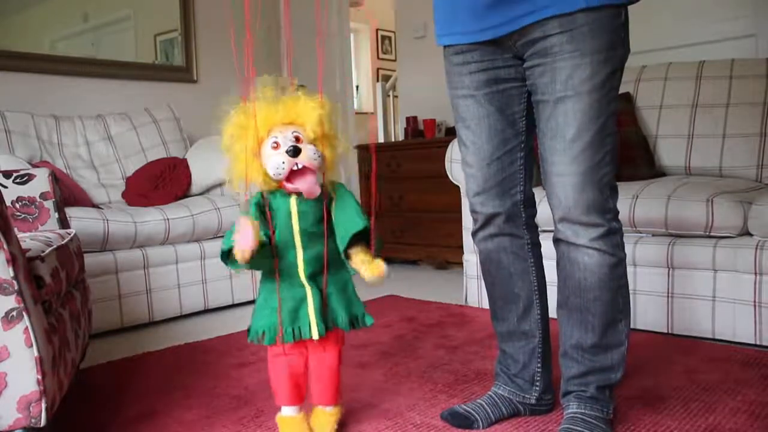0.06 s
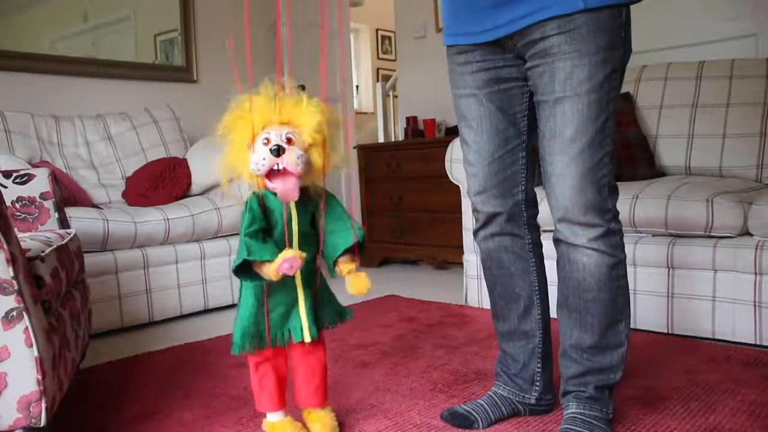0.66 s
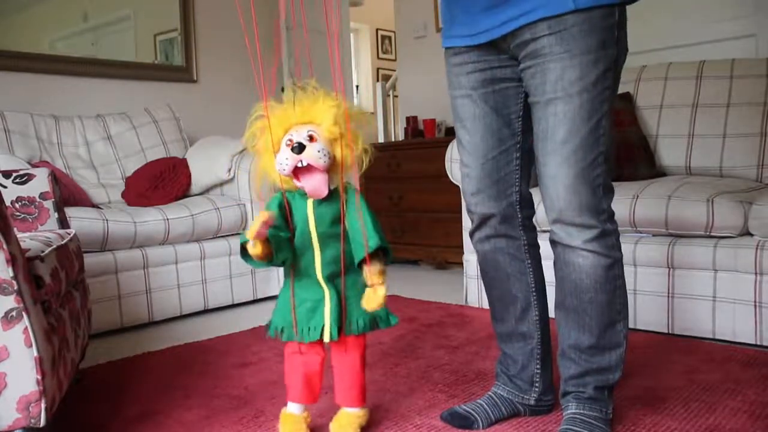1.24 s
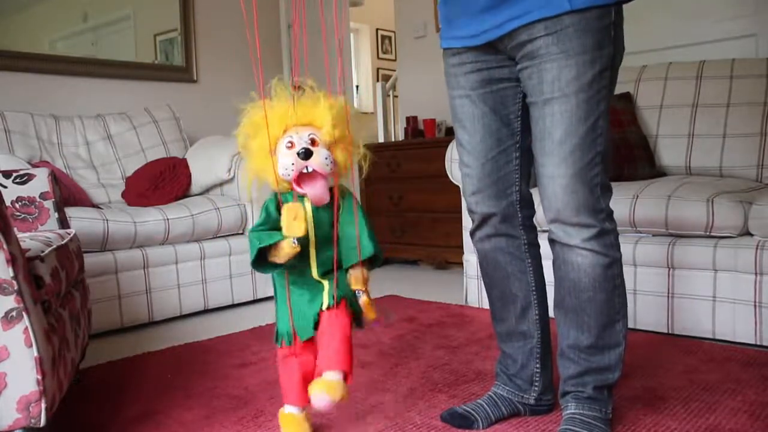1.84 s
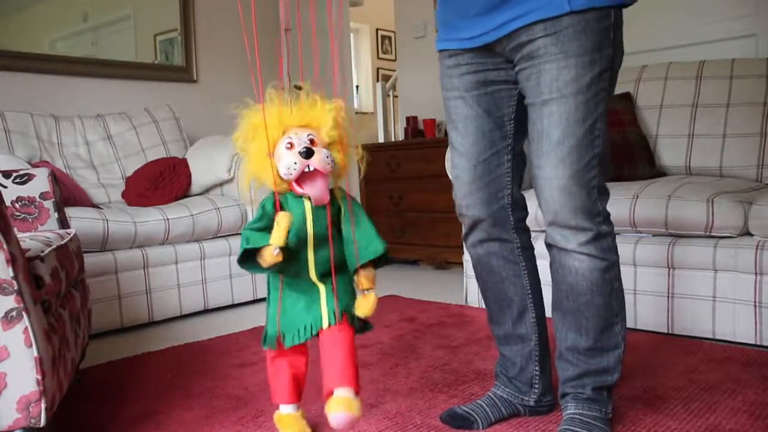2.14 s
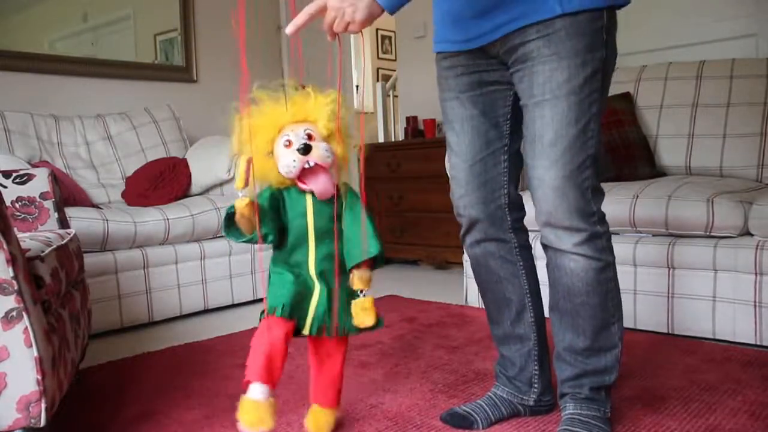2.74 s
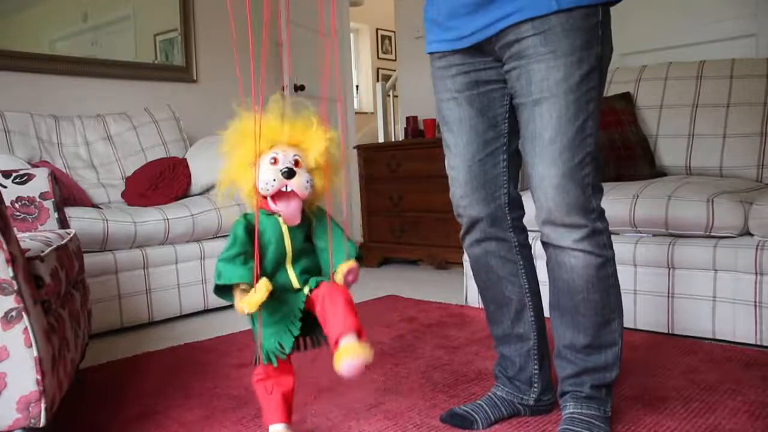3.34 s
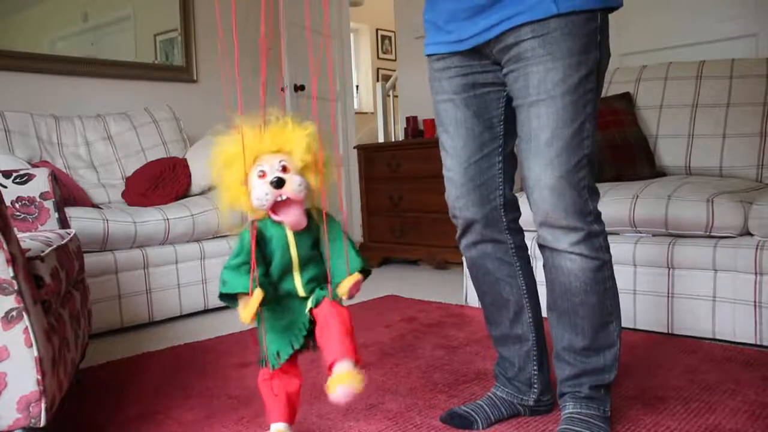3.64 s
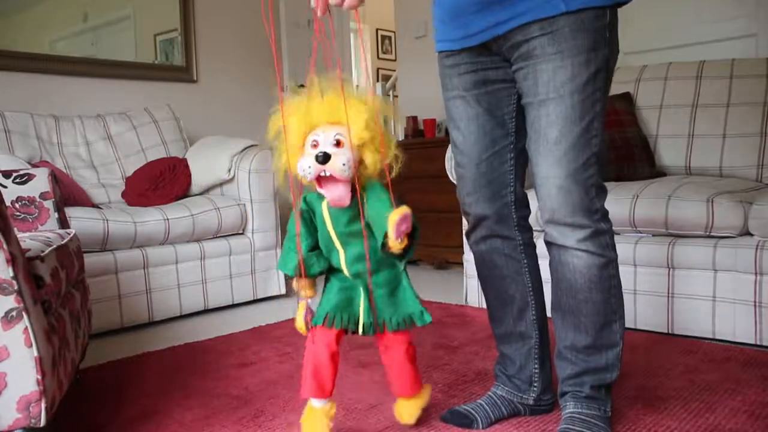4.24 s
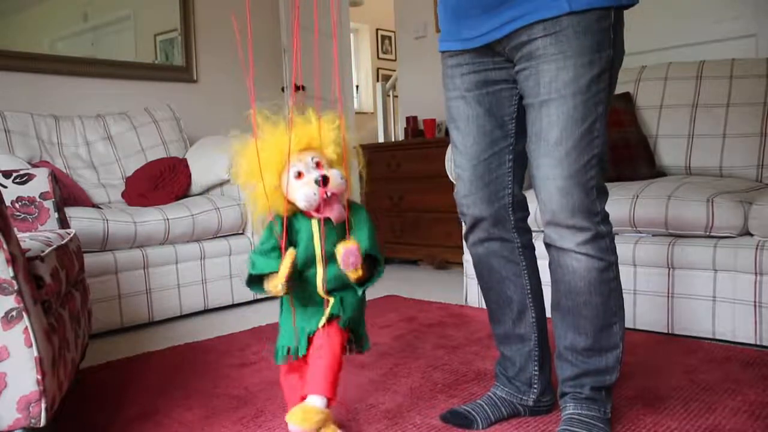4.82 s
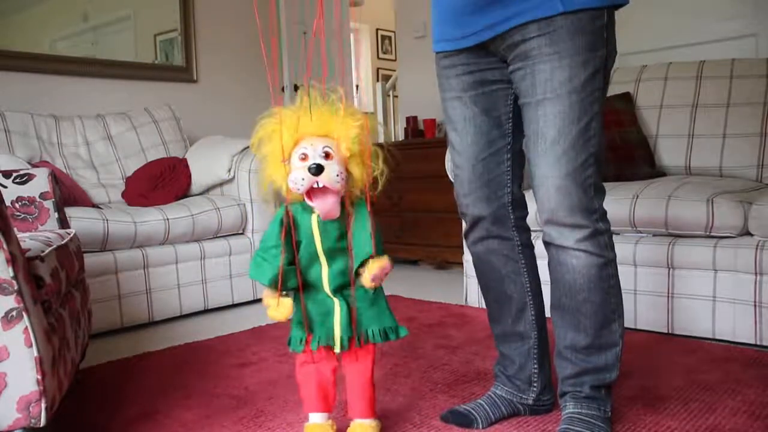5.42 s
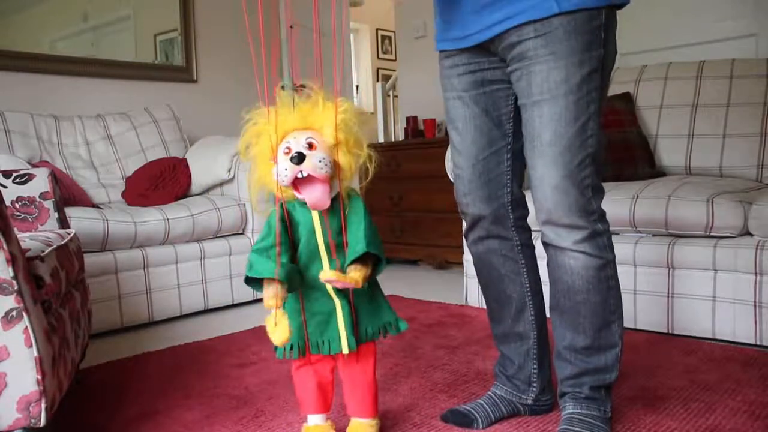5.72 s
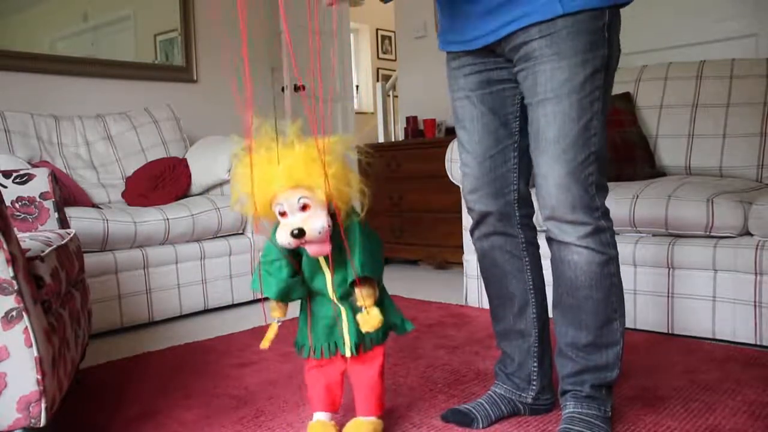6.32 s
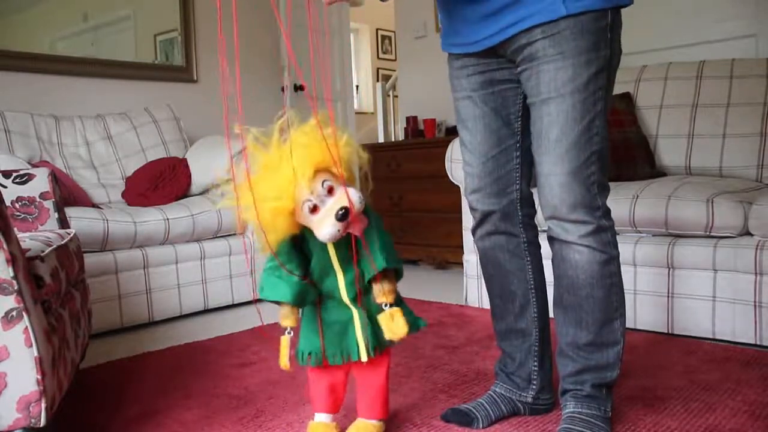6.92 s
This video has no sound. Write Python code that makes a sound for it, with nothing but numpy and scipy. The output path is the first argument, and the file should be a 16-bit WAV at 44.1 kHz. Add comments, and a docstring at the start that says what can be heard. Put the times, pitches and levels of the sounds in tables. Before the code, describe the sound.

Light wooden clicks and clacks from a moving marionette, with soft thuds and rubbing strings, over a faint living room hush.

```python
"""A wooden string puppet dances over a carpet in a quiet living room.
The sticks of its control bar and its limbs knock together, each contact a click that sets the wood
ringing; twice they bounce into a loud clatter, and soft blows thud on its hollow body.
Strings and cloth rub in between and jog the loose joints into faint ticks.
The furnished room answers briefly over a faint steady hush."""
import sys
import numpy as np
from scipy import signal
from scipy.fft import rfft, irfft
from scipy.io import wavfile
from scipy.ndimage import uniform_filter1d

SR = 44100
rng = np.random.default_rng(int(sys.argv[2]) if len(sys.argv) > 2 else 0)


def store_pcm(level_fs):
    """Save levels as 16-bit WAV."""
    pcm = np.round(np.clip(level_fs, -1, 1) * 32767).astype(np.int16)
    wavfile.write(sys.argv[1], SR, np.atleast_2d(pcm).T)


N = 311346

# tone of the still room: (frequency [Hz], relative level [dB])
HUSH_SPECTRUM = [(15, -38), (30, -20), (44, 0), (62, -9), (115, -6), (240, -5.5), (340, -6.5), (425, -5.5),
                 (560, -9), (1000, -10.5), (2000, -13.5), (6500, -18), (11000, -22.5), (16000, -30.5)]
# how alike the hush is in both ears: (frequency [Hz], correlation [0-1])
HUSH_LIKENESS = [(40, 0.74), (110, 0.27), (300, 0.38), (800, 0.25), (3000, 0.033), (14000, 0.043)]
# strings and joints rubbing: (start [s], end [s], wood rasp [dB], string hiss [dB])
RUB_STROKES = [(0, 0.198, -60, -56.5), (0.209, 0.253, -57.5, -60), (0.268, 0.325, -54.5, -53.5),
               (0.404, 0.498, -52.5, -57), (0.605, 0.662, -55, -58.5), (0.693, 0.827, -56, -65),
               (1.147, 1.202, -47, -57), (1.203, 1.293, -44, -60), (1.712, 1.803, -46, -57),
               (2.311, 2.364, -50, -61), (2.377, 2.618, -67, -67), (2.915, 3.207, -62.5, -64.5),
               (3.757, 4.074, -60, -61), (4.377, 4.473, -58, -65), (5.041, 5.095, -58, -69),
               (5.275, 5.336, -48, -54), (5.386, 5.668, -59.5, -69), (6.233, 6.264, -53, -60)]
# tone of a rub on wood: (frequency [Hz], relative level [dB])
RASP_SPECTRUM = [(150, -40), (410, 16), (600, -6.5), (1000, 7), (1600, 5), (2400, 7.5), (3000, 9),
                 (3600, 6.5), (4450, 7), (5300, 0), (9000, -7.5), (16000, -11)]
# tone of a sliding string: (frequency [Hz], relative level [dB])
HISS_SPECTRUM = [(2000, -62), (5400, 6), (6500, 6.5), (7600, 16), (8700, 1), (11500, -20), (16000, -30)]
# resonances of the sticks: (frequency [Hz], level [dB], t60 [s])
STICK_RESONANCES = [(2160, -39, 0.047), (2276, -21.5, 0.17), (2485, -6.5, 0.011), (2572, -8, 0.08),
                    (2665, -26.5, 0.058), (3224, -13, 0.014), (3150, -49, .035), (3626, -5.5, 0.036),
                    (4183, -54, 0.051), (4440, -14, 0.086), (4750, -13, 0.033), (6350, -11, 0.019),
                    (7270, -21.5, 0.016), (6860, -10, 0.018)]
# tone of the bare contact of two sticks: (frequency [Hz], relative level [dB])
CONTACT_SPECTRUM = [(100, -31), (300, -15), (450, -5.5), (700, -10.5), (1000, -6.5), (1500, -10),
                    (2100, 4.5), (3000, -0.5), (4400, 2.5), (5500, -8.5), (7200, -6.5), (8600, -12),
                    (11000, -6.5), (16000, -9.5)]
# notes of the loose pieces: (frequency [Hz])
PIECE_NOTES = [2070, 2250, 2580, 3270, 3630, 4210, 4440, 4680]
# wood on wood: (time [s], strength [dB], struck piece's note [Hz], note's ring [dB], brightness [dB])
WOOD_HITS = [(0.607, -25, 6320, 3.5, 8.5), (0.728, -31, 4380, -10, 13), (0.7452, -23, 4460, -8.5, 7.5),
             (0.7608, -29.5, 2600, 13, -1), (0.7806, -18.5, 4440, 3.5, 1), (0.8087, -26, 4350, 1, 3),
             (0.8437, -18.5, 4470, 4, 4), (0.9623, -12, 2420, -4.5, 2.5), (1.1436, -18.5, 2650, 3.5, 5),
             (1.2712, -11, 4420, 2, 9), (1.276, -6, 2250, 5, -2), (1.2813, -5.5, 3530, 1.5, 8.5),
             (1.285, -7.5, 4440, 3.5, -18), (1.2967, -22, 4440, 10, 9), (1.3213, -11, 2300, -10, 2),
             (1.3328, -12.5, 3530, 5.5, 6), (1.4577, -24.5, 2606, 4, 2.5), (1.6816, -18.5, 4530, 3.5, 5.5),
             (1.6899, -16.5, 4300, -4.5, 2.5), (1.7329, -25, 2500, 2, -8), (1.7821, -20, 2290, -5, -18),
             (1.8439, -15.5, 2330, 0, 4), (1.868, -17, 2350, 1, 1.5), (2.1623, -25.5, 4420, -1.5, 1),
             (2.273, -27, 2360, 2, 9), (2.327, -28.5, 4300, 7, 0), (2.343, -31.5, 2510, 8.5, -6),
             (2.61, -33.5, 2520, 3, 4.5), (2.932, -28, 3840, 3, 4), (3.068, -24.5, 2366, 3, 4.5),
             (3.0852, -27, 2570, 4, 6), (3.1188, -32, 2160, -3, -6), (3.1554, -26.5, 2880, -3, 2),
             (3.2268, -28.5, 2680, 5, 10), (3.4664, -35.5, 2820, 6.5, 8), (3.603, -32.5, 2880, 5.5, 9),
             (3.682, -20, 3580, 2, -7.5), (4.1811, -23.5, 2670, 4.5, 6), (4.449, -16.5, 2580, -4.5, -10),
             (5.1115, -23, 2380, -1, -2), (5.1316, -8.5, 2500, 0, -1.5), (5.1492, -13.5, 3480, 3, 4),
             (5.194, -22, 4350, 11, 7), (5.2036, -1.5, 2550, -3, -6), (5.219, -14, 3560, 4, 3),
             (5.2912, -23.5, 2640, 5, 8), (5.313, -22.5, 3830, 4, 12.5), (5.508, -26.5, 2260, 0, 7),
             (5.5495, -25, 2750, -9.5, -3), (5.7697, -25, 4400, 2, 6.5), (5.9119, -32, 2730, 4.5, 1),
             (6.3241, -21, 2335, -2, 8), (6.3445, -25, 2580, 9, 6), (6.348, -23, 4470, 9.5, -4),
             (6.3898, -23, 2355, 6.5, 5)]
# loose limbs bouncing together after a jerk: (start [s], end [s], strength [dB])
LIMB_CLATTERS = [(1.258, 1.352, -16.5), (5.128, 5.232, -23)]
# soft blows on the hollow body: (time [s], level [dB])
BODY_HITS = [(1.324, -28), (1.752, -48.5), (1.847, -43), (2.335, -49), (3.068, -50), (3.118, -50),
             (4.449, -40.5), (5.232, -34), (6.571, -44.5)]
# resonances of the body: (frequency [Hz], level [dB], t60 [s])
BODY_RESONANCES = [(368, -7, .06), (400, 0, .07), (470, -8, .05), (545, -13, .04), (700, -17, .025),
                   (950, -17, .02)]
# early reflections off ceiling, walls and furniture: (delay [s], left gain [x], right gain [x])
REFLECTIONS = [(.0007, 0.1, 0.027), (.0014, 0.037, 0.21), (.0040, 0.37, 0.47), (.0075, 0.13, 0.18),
               (0.0105, 0.3, 0.36), (0.0142, 0.19, 0.21)]
# decay of the room's tail: (frequency [Hz], t60 [s])
ROOM_DECAY = [(250, 0.18), (700, 0.65), (2000, 0.27), (4500, 0.27), (9000, 0.34), (15000, 0.074)]
# the puppet's stereo balance: (frequency [Hz], left over right [dB])
BALANCE = [(100, -2), (400, -0.5), (700, -1.5), (2400, -3.5), (4400, -1.5), (8000, 0.5), (15000, 1.5)]


def amp(db):
    """Decibels to gain."""
    return 10 ** (np.asarray(db) / 20)


def unit(x):
    """Scales to an rms of 1."""
    return x / np.sqrt(np.mean(x ** 2) + 1e-20)


def curve(points, hz):
    """Joins (frequency [Hz], value) points by straight lines on a log-frequency axis."""
    point_hz, value = np.transpose(points)
    return np.interp(np.log(hz + 1), np.log(point_hz + 1), value)


def add(mix, s, sound):
    """Mixes a sound in at s seconds."""
    part = mix[max(round(s * SR), 0):][:len(sound)]
    part += sound[:len(part)]


def equalise(x, points):
    """Runs a whole track through an EQ of (frequency [Hz], level [dB]) points."""
    return irfft(rfft(x) * amp(curve(points, np.fft.rfftfreq(N, 1 / SR))), N)


def pulse(points, size=1024):
    """The tightest one-sided pulse with a spectrum of (frequency [Hz], level [dB]) points."""
    log_gain = np.log(amp(curve(points, abs(np.fft.fftfreq(size, 1 / SR)))))
    return np.fft.ifft(np.exp(np.conj(signal.hilbert(log_gain)))).real[:size // 2]


def ring(modes, t, uneven_db, detune):
    """Dying sines, one row a mode; where the blow lands shifts their levels and pitch a little."""
    hz, db, t60 = np.transpose(modes)[:, :, None]
    share, pitch = rng.standard_normal((2, len(modes), 1))
    sines = np.sin(2 * np.pi * hz * (1 + detune * pitch) * t)
    return amp(db + uneven_db * share) * sines * np.exp(-np.log(1000) * t / t60)


def hush(level_db=-52.5):
    """A bed of steady house noise, narrow in the bass and wide on top."""
    left, other = rfft(rng.standard_normal((2, N)))
    likeness = curve(HUSH_LIKENESS, np.fft.rfftfreq(N, 1 / SR))
    right = likeness * left + np.sqrt(1 - likeness ** 2) * other
    return amp(level_db) * unit(equalise(irfft([left, right], N), HUSH_SPECTRUM))


def rubs(slips_per_s=4500, slip_spread_db=2.8, ringing=0.044, fade_share=0.55, catch_db=2, idle_db=-66):
    """Tiny uneven slips rasp and ring the wood while the strings hiss; the costume never quite rests."""
    t = np.arange(N) / SR
    rasp_level, hiss_level = np.zeros((2, N))
    for start, end, rasp_db, hiss_db in RUB_STROKES:
        inside = np.minimum(t - start if start > 0 else end, end - t) / (end - start)
        stroke = np.sin(np.pi / 2 * np.clip(2 * inside / fade_share, 0, 1)) ** 2
        rasp_level += amp(rasp_db - 1) * stroke
        hiss_level += amp(hiss_db - 2) * stroke
    sizes = amp(slip_spread_db * np.minimum(rng.exponential(1, N), 4)) * rng.choice([-1, 1], N)
    slips = unit(sizes * (rng.random(N) < slips_per_s / SR))
    sticks = ring(STICK_RESONANCES, np.arange(SR // 8) / SR, uneven_db=0, detune=0).sum(0)
    stick_ring = unit(signal.oaconvolve(slips, sticks)[:N])
    wood = unit(unit(equalise(slips, RASP_SPECTRUM)) + ringing * stick_ring)
    string = unit(equalise(slips + rng.standard_normal(N), HISS_SPECTRUM))
    # the surfaces catch and let go every few hundredths of a second
    grip = uniform_filter1d(uniform_filter1d(rng.standard_normal(N), size=700), size=300)
    catch = amp(catch_db * unit(grip))
    return catch * ((rasp_level + amp(idle_db) * catch) * wood + hiss_level * string)


def rattle(spans, per_s, ring_db, bright_db, uneven_db=2, spread_db=0.5, ends_db=-5, count=32):
    """Rows of small knocks: random loose pieces meet at uneven gaps, hardest mid-span."""
    hits = []
    for start, end, db in spans:
        times = start + (np.arange(count) + rng.random(count)) / per_s
        notes = rng.choice(PIECE_NOTES, count)
        for s, hz, (size, free, bright) in zip(times, notes, rng.standard_normal((count, 3))):
            if s < end:
                arch_db = ends_db * (2 * (s - start) / (end - start) - 1) ** 2
                hit_db = db + arch_db + uneven_db * size
                hits.append((s, hit_db, hz, ring_db + spread_db * free, bright_db + spread_db * bright))
    return hits


def loose_joints(tick_over_rasp_db=20.5):
    """Rubs jog the joints into sparse ticks; jerks set the limbs bouncing in a fast clatter."""
    bounces = rattle(LIMB_CLATTERS, per_s=200, ring_db=5, bright_db=3)
    jogs = [(start, end, rasp_db + tick_over_rasp_db) for start, end, rasp_db, _ in RUB_STROKES]
    ticks = rattle(jogs, per_s=30, ring_db=3, bright_db=-4.5)
    return knocks(bounces + ticks)


def knock_colour(db, note_hz, note_db, bright_db, favour_db=2.5, favour_octaves=0.21):
    """The EQ of one blow, as a pulse: it favours the stick modes near the struck piece's note."""
    clack_db = -1.03 * note_db - 0.32 * db  # held pieces and light blows give more dull low clack
    air_db = -5.5 + 0.1 * db  # light touches are softer in the top octave
    band_hz = np.array([2150, 2700, 3200, 3800, 4250, 4650])
    nearness = np.exp(-(np.log2(band_hz / note_hz) / favour_octaves) ** 2)
    band_db = 0.17 * bright_db * (band_hz > 3000) + favour_db * (nearness - 0.5)
    treble = [(6000, bright_db), (8500, bright_db), (14000, bright_db + air_db)]
    return pulse([(1500, clack_db), *zip(band_hz, band_db), *treble])


def knocks(hits, graze_db=-29, graze_s=0.0035, buzz_s=0.0015, note_t60=0.029, lead_samples=400):
    """Wood on wood: a graze, a buzzing click, the ring of the sticks and the struck piece's note."""
    out, t = np.zeros(N), np.arange(3072) / SR
    lead_s = lead_samples / SR
    contact = pulse(CONTACT_SPECTRUM)
    contact /= np.linalg.norm(contact)
    sides = (-1) ** np.arange(len(STICK_RESONANCES))  # neighbouring modes swing opposite ways
    for s, db, note_hz, note_db, bright_db in hits:
        # the pieces slide along each other for an instant before they meet
        swell = np.exp(-t[:lead_samples][::-1] / graze_s)
        graze = amp(graze_db) * rng.standard_normal(lead_samples) * swell
        # bright, glancing contacts chatter more; light touches scuff for longer
        scuff = np.exp(-t / (buzz_s * amp(-0.18 * db)))
        touch = (t == 0) + amp(-9 + 0.69 * bright_db) * rng.standard_normal(len(t)) * scuff
        click = signal.fftconvolve(np.concatenate([graze, touch / np.linalg.norm(touch)]), contact)
        sticks = sides @ ring(STICK_RESONANCES, t, uneven_db=1.5, detune=0.005)
        add(click, lead_s, amp(-21 + 0.85 * min(note_db, 0)) * sticks)  # a held piece damps the sticks
        knock = amp(2) * signal.fftconvolve(click, knock_colour(db, note_hz, note_db, bright_db))
        note = np.sin(2 * np.pi * note_hz * t) * np.exp(-np.log(1000) * t / note_t60)
        add(knock, lead_s, amp(note_db) * note / np.linalg.norm(note))
        add(out, s - lead_s, amp(db) * knock)
    return out


def thuds(attack_s=0.0022, echo_s=0.0125, echo_db=-1, low_cut_hz=310):
    """A padded blow rings the hollow body, too small to give off bass, and a quick echo follows."""
    out, t = np.zeros(N), np.arange(SR // 4) / SR
    attack = 1 - np.exp(-t / attack_s)
    for s, db in BODY_HITS:
        blow = amp(db) * attack * ring(BODY_RESONANCES, t, uneven_db=0.7, detune=0.004).sum(0)
        add(out, s, blow)
        add(out, s + echo_s, amp(echo_db) * blow)
    return signal.sosfilt(signal.butter(4, low_cut_hz, "highpass", fs=SR, output="sos"), out)


def room(x, tail_db, echo_db, build_s=0.0024, likeness=0.047):
    """The direct sound, a few early reflections and a short, wide diffuse tail."""
    t = np.arange(SR // 2) / SR
    shared, apart = rng.standard_normal(len(t)), rng.standard_normal((2, len(t)))
    noise = np.sqrt(likeness) * shared + np.sqrt(1 - likeness) * apart
    hz, age, bands = signal.stft(noise, SR, nperseg=256)
    decay = np.exp(-np.log(1000) * age / curve(ROOM_DECAY, hz)[:, None])
    tail = signal.istft(bands * decay, SR)[1][:, :len(t)]
    tail *= 1 - np.exp(-t / build_s)
    response = amp(tail_db) * tail / np.linalg.norm(tail[0])
    response[:, 0] += 1
    for delay, *gains in REFLECTIONS:
        for ear, gain in zip(response, gains):
            # each reflection is slightly dulled and reaches each ear at its own moment
            add(ear, delay + rng.uniform(0, 0.00034), amp(echo_db) * gain * np.array([0.8, 0.3]))
    return signal.fftconvolve(x[None], response, axes=1)[:, :N]


def swing_in_room(x, tail_db, echo_db, count=3, turns_per_s=2.3):
    """The puppet swings about, so its sound crossfades from one set of room paths to the next."""
    angle = 2 * np.pi * (turns_per_s * np.arange(N) / SR + np.arange(count)[:, None] / count)
    shares = np.maximum(np.cos(angle), 0) ** 4
    return sum(room(x * share, tail_db, echo_db) for share in shares / shares.sum(0))


def pan(pair, lag_s=1.1e-5):
    """Gives each side its own colour, with the right a touch late."""
    hz = np.fft.rfftfreq(N, 1 / SR)
    lean = amp(curve(BALANCE, hz) / 2)
    lag = np.exp(-2j * np.pi * hz * lag_s)
    return irfft(rfft(pair) * np.array([lean, lag / lean]), N)


def scene():
    """The puppet's sticks and drier body in the room, over the hush."""
    bed = hush()
    body = room(thuds(), tail_db=-8, echo_db=-9)
    sticks = swing_in_room(knocks(WOOD_HITS) + rubs() + loose_joints(), tail_db=-3, echo_db=-5.5)
    return pan(sticks + body) + bed


def record(dry):
    """A steep high cut on the whole mix."""
    high_cut = signal.firwin(401, cutoff=15950, window=("kaiser", 8), fs=SR)
    return signal.oaconvolve(dry, high_cut[None], "same")


dry = scene()
out = record(dry)
store_pcm(out)
```